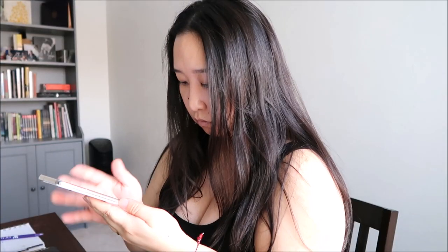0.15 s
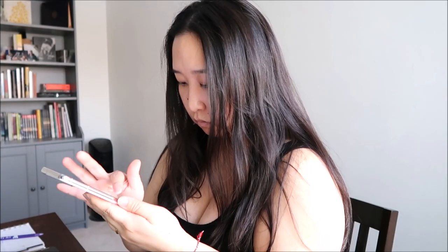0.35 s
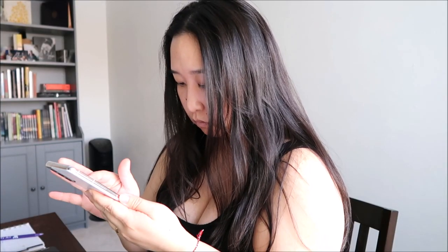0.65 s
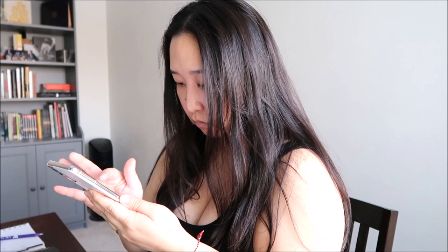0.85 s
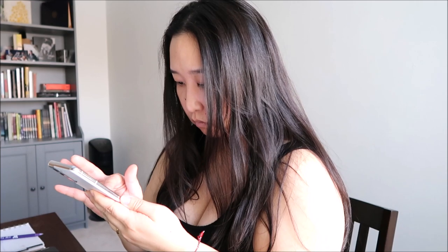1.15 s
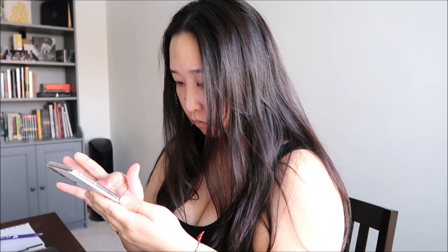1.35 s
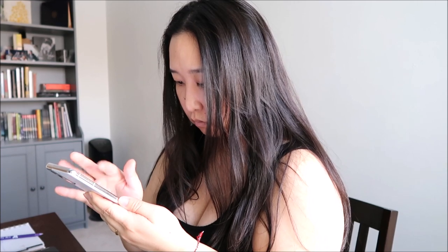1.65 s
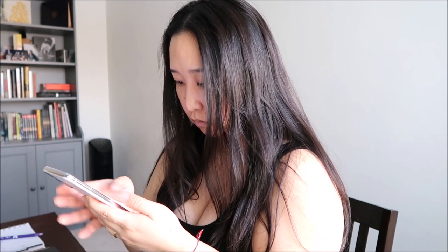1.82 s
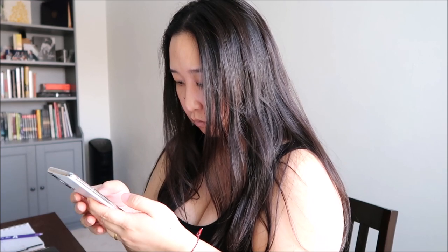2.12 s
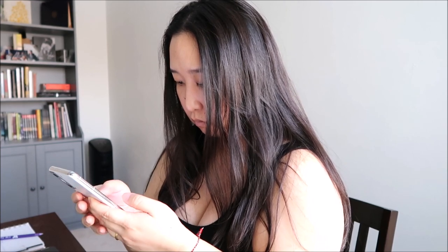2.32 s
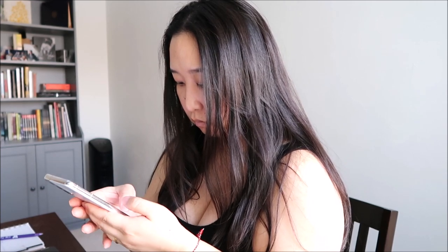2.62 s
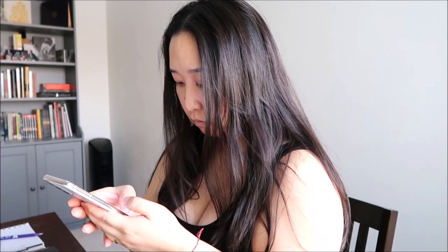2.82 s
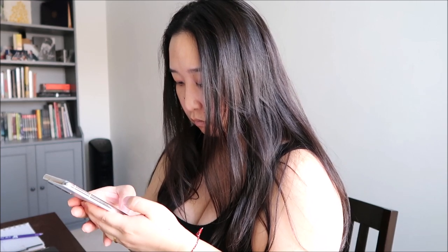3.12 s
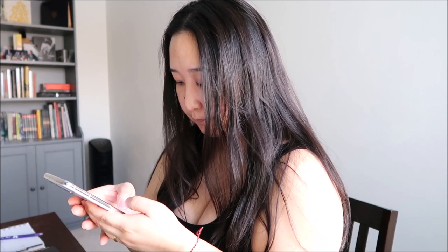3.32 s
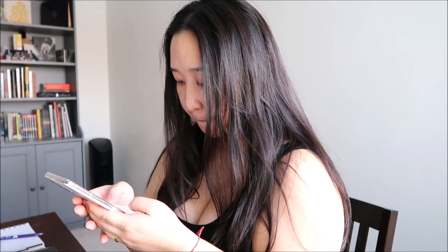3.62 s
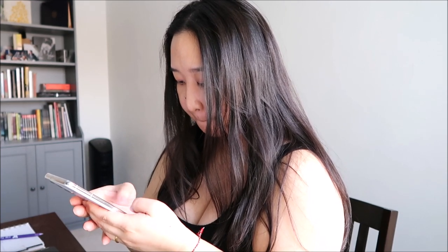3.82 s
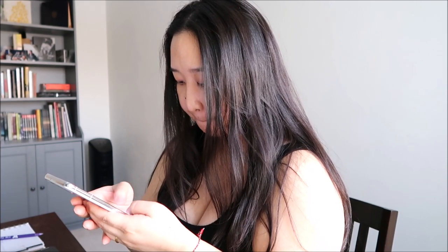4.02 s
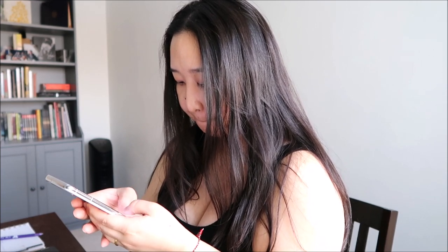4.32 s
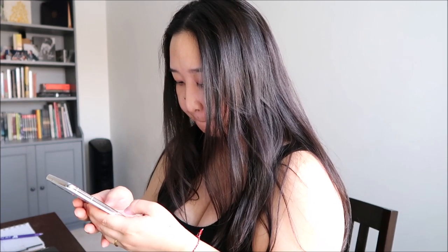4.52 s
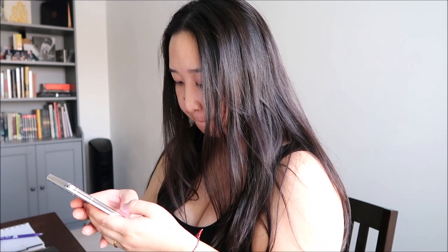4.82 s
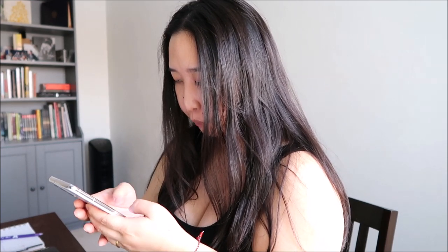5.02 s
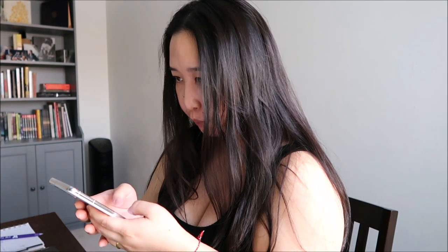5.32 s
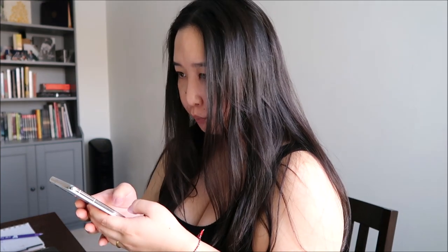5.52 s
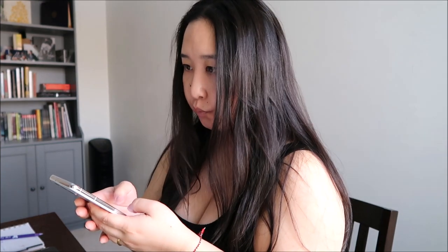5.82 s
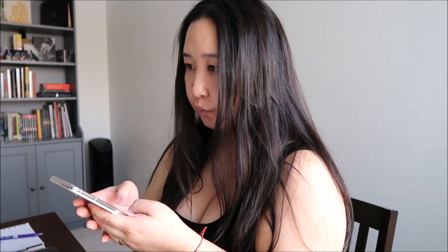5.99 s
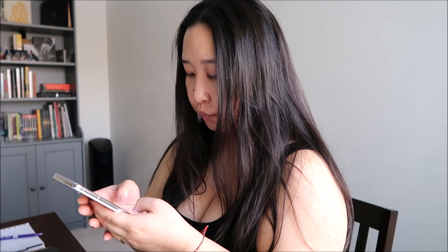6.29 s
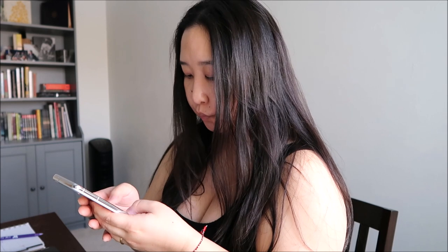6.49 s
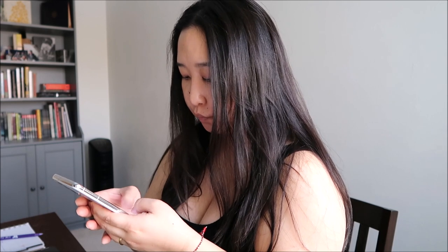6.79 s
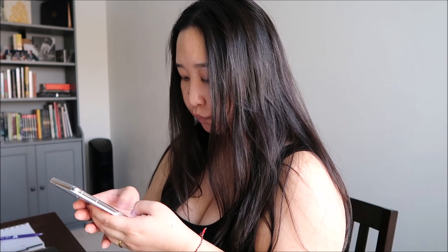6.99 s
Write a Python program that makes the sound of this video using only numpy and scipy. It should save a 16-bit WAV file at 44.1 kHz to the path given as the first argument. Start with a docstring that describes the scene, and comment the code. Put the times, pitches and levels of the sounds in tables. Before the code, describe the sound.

Throughout about seven seconds, a quiet study holds a low electrical hum, strongest near 120 Hz and wavering slightly, with a faint appliance motor, softly swelling rumble and thin airy hiss. A weak high whine around 2.4 kHz flutters nine to ten times a second, slightly to the left. Very close to the stereo camera microphones, the focus drive makes tiny dry, bright ticks around 4 kHz: a short burst from 0.1 to 0.4, a few separate clicks at 0.7 to 0.85, then rapid uneven patterns repeating five times a second from 0.9 to 2.4 and 2.55 to 5.05. Irregular single ticks follow until about 6.17, with faint dull knocks under some at 5.87, 5.9 and 6.1. A barely audible 13 kHz electronic whistle throbs throughout. After the ticks stop, only hum, whine and room air continue to the end.

```python
"""Room tone in a quiet study

Mains hum and an appliance motor, each a sum of tones, sit on shaped-noise rumble and hiss.
Two close high tones form a thin whine that beats nine to ten times a second.
Near the two microphones the camera's lens ticks (noise bursts through body modes) and its
electronics whistle, a throbbing sine; dull knocks of resonant noise lie under some of the last ticks."""
import sys
import numpy as np
from scipy import signal
from scipy.fft import rfft, irfft
from scipy.io import wavfile

SR = 44100
rng = np.random.default_rng(int(sys.argv[2]) if len(sys.argv) > 2 else 0)


def digitize_waveform(pressure):
    """Quantize a signal to 16-bit integers and store it at the path in sys.argv[1].

    Rows of a 2-D input are taken as channels; values are limited to [-1, 1].
    """
    field = np.atleast_2d(pressure).T
    bounded = np.clip(field, -1, 1)
    quanta = np.round(bounded * 32767).astype(np.int16)
    wavfile.write(sys.argv[1], SR, quanta)


N = 315315
T = np.arange(N) / SR
FREQS = np.fft.rfftfreq(N, 1 / SR)
LEFT_RIGHT = np.array([[1], [-1]])

MAINS_HZ = 60
# Hum of transformers and motors. Each row: multiple of the mains frequency, level in dB.
HUM_HARMONICS = [(1, -66), (2, -45), (6, -69.5), (7, -73), (8, -58), (10, -68.5)]
# Uneven level of the 120 Hz hum where it mixes with the rumble.
# Each row: time in seconds, change in dB before waver_share.
HUM_WAVER = [(0.0, 2), (0.12, 3), (0.33, -4), (0.7, 2), (1.25, -2), (1.42, 2), (1.77, 2), (2.1, 0),
             (2.35, -3), (2.7, 0), (3.2, -2), (4.08, 1), (4.55, -4), (4.95, 3.5), (5.25, -2), (6.0, 0.7),
             (6.3, 1.8), (6.58, -4), (7.15, 3.5)]
# Tones of a running appliance. Each row: frequency in Hz, level in dB before flutter.
MOTOR_TONES = [(29.9, -79), (53.6, -63.5), (90.3, -64.5), (330.5, -67.5), (362, -73.5), (665.2, -72.5),
               (1049, -81), (1230.5, -74.5), (1692, -76), (2341, -84), (2511, -80.5)]

# Loudness of the whine. Each row: time in seconds, level in dB before the left-right offset.
WHINE_LEVEL_DB = [(0.0, -65.5), (0.3, -64.5), (0.85, -68.5), (1.4, -62), (1.85, -62.5), (2.35, -62),
                  (3.3, -69.5), (3.9, -66), (4.45, -65.5), (4.85, -70), (5.2, -65), (5.95, -68),
                  (6.6, -64.5), (7.15, -63.5)]
# Drift of the whine. Each row: time in seconds, lower tone in Hz before jitter, distance to the upper in Hz.
WHINE_PITCH_HZ = [(0, 2426, 9.31), (1.1, 2428.2, 9.05), (1.8, 2427.1, 9.71), (2.5, 2425.8, 9.41),
                  (3.1, 2425, 8.84), (3.7, 2424.6, 9.66), (4.3, 2423.5, 9.21), (5.1, 2424.9, 9.49),
                  (5.7, 2426.9, 8.89), (6.4, 2427.6, 9.4), (7.15, 2429.3, 9.52)]
WHINE_UPPER_GAIN, WHINE_PAN_DB, WHINE_LEFT_LEAD_RAD = .75, 2.2, .42
FIRST_BEAT_S = .058

# One to-and-fro cycle of the focus drive. Each row: seconds into the cycle, dB relative to the bout.
CYCLE_STEPS = [(0, 4.5), (.0145, 0.5), (.0335, 0.5), (.0575, -3.5), (.1005, 2.5), (.114, -1.5), (.133, -4),
               (.1575, 1.5)]
# Bouts of repeated cycles. Each row: first second, end in seconds, dB relative to tick_db.
FOCUS_BOUTS = [(.119, .37, -4), (0.918, 2.41, -4), (2.555, 5.05, -2.5)]
# Single steps of the focus outside the regular cycle, loud and soft.
# Each row: time in seconds, dB relative to tick_db.
SINGLE_STEPS = [(0.688, 4.5), (.692, 0), (.720, 2), (.7535, -1), (.822, 3), (.840, 1), (5.132, 0),
                (5.198, 1), (5.293, 2), (5.332, 1), (5.399, 0), (5.467, 1), (5.632, 1), (5.650, 1),
                (5.700, 3), (5.717, 0), (5.767, 4), (5.800, -1), (5.817, -2), (5.867, 2), (5.873, -1),
                (5.900, 2), (5.916, -1), (5.966, 3), (6.106, 0), (6.138, 1), (6.166, 4)]
# Ring of the camera body. Each row: frequency in Hz, width in Hz, relative dB, left lead in radians.
BODY_MODES = [(3760, 260, -2, -1.5), (4150, 87, 7, 2.5), (4430, 270, -1.5, 0.73), (4860, 340, -9, -2.5),
              (5290, 170, -5.5, 1.5), (5830, 250, -10, 3)]
FOCUS_CYCLE_S, STRAYS_FROM_S, STRAYS_UNTIL_S = .2002, 0.87, 6.15

# Dull low knocks of the lens drive, under some of its last ticks.
# Each row: start in seconds, initial level in dB.
KNOCKS = [(5.868, -53), (5.897, -56), (6.106, -54.5)]

# Building rumble lifted by low room resonances. Each row: frequency in Hz, dB per Hz before trim and swell.
RUMBLE_SPECTRUM = [(18, -102), (38, -84.5), (54, -75.5), (66, -78), (100, -69), (135, -69.5), (172, -67),
                   (190, -70), (208, -68.5), (228, -78), (290, -78.5), (342, -76.5), (405, -83.5),
                   (428, -79.5), (462, -78), (495, -84.5), (525, -81.5), (570, -87.5)]
# Moving air and microphone hiss. Each row: frequency in Hz, dB per Hz before trim and flicker.
HISS_SPECTRUM = [(690, -86.5), (730, -86), (810, -86.5), (900, -89.5), (980, -88.5), (1130, -91.5),
                 (1350, -90.3), (1580, -91), (1700, -90.5), (1810, -94.5), (2110, -95.5), (2260, -92),
                 (2480, -94), (2750, -98.5), (3500, -101.3), (4700, -105), (6300, -108.6), (9000, -113.1),
                 (11500, -116.7), (12700, -120), (13400, -129.5)]
# Noise that differs between the microphones. Each row: frequency in Hz, dB per Hz before trim.
SIDE_SPECTRUM = [(18, -113), (60, -98), (130, -87), (220, -83), (460, -84), (550, -89.5), (1100, -93),
                 (2200, -99), (2420, -97.5), (2700, -101), (4000, -103), (6500, -109), (12500, -118.8),
                 (13400, -131.5)]
# Swell of the rumble. Each row: time in seconds, change in dB before swell_share.
RUMBLE_SWELL = [(0, -1), (0.55, 0.5), (1.23, -2), (1.5, 1.5), (2.4, -1.7), (3.15, 0), (3.45, 1), (4, 1),
                (4.5, 0), (4.97, 0.5), (5.3, 0), (5.6, 2), (6.1, -1), (6.5, 0.8), (6.85, -5), (7.15, 3)]
TOP_HZ = 13400


def undb(db):
    """Decibels to amplitude gain."""
    return 10 ** (np.asarray(db) / 20)


def walk(edge_hz):
    """Smooth random drift of rms 1: noise with a Gaussian rolloff, 1/e at edge_hz."""
    drift = irfft(rfft(rng.standard_normal(N)) * np.exp(-(FREQS / edge_hz) ** 2), N)
    return drift / np.sqrt(np.mean(drift ** 2))


def curve(points):
    """Straight-line interpolation of (s, value) points over the whole scene."""
    return np.interp(T, *np.transpose(points))


def noise(points):
    """Noise with a spectrum of (Hz, dB per Hz) points, interpolated over log frequency."""
    hz, db = np.transpose(points)
    gain = undb(np.interp(np.log(FREQS + 1), np.log(hz), db))
    return irfft(rfft(rng.standard_normal(N)) * gain, N) * np.sqrt(SR / 2)


def tone(hz, left_lead_rad=0):
    """Stereo sine of rms 1 and random phase; the left leads the right by left_lead_rad."""
    phase = 2 * np.pi * (np.cumsum(hz * np.ones(N)) / SR + rng.random())
    return np.sqrt(2) * np.cos(phase + LEFT_RIGHT * left_lead_rad / 2)


def resonance(hz, width_hz):
    """Complex response of one mode, gain 1 at its centre."""
    return 1j * FREQS * width_hz / (hz ** 2 - FREQS ** 2 + 1j * FREQS * width_hz)


def mains_hum(waver_share=0.8):
    """Harmonics locked to the mains; the second dominates, its level wavering irregularly."""
    hum = 0
    for multiple, db in HUM_HARMONICS:
        if multiple == 2:
            db = db + waver_share * curve(HUM_WAVER)
        hum = hum + undb(db) * tone(multiple * MAINS_HZ)
    return hum


def appliance(slip=0.0008, smear=0.0024, flutter_db=3.2):
    """Motor tones wander with load and flutter across the room; those above 1 kHz blur into narrow bands."""
    speed = 1 + slip * walk(6.1)  # shared by all tones
    motor = 0
    for hz, db in MOTOR_TONES:
        level = undb(db + flutter_db * walk(14.0))
        blur = (hz > 1000) * smear * walk(15.5)
        motor = motor + level * tone(hz * (speed + blur))
    return motor


def whine(jitter_hz=1.46, flutter_db=2.1):
    """Two close high tones drift together; their small, changing distance sets the pace of the beats."""
    times, lower_hz, apart_hz = np.transpose(WHINE_PITCH_HZ)
    hz = np.interp(T, times, lower_hz) + jitter_hz * walk(19.7)
    beat_cycles = np.cumsum(np.interp(T, times, apart_hz)) / SR - apart_hz[0] * FIRST_BEAT_S
    lower = np.exp(2j * np.pi * np.cumsum(hz) / SR + .5j * WHINE_LEFT_LEAD_RAD * LEFT_RIGHT)
    upper = lower * np.exp(2j * np.pi * beat_cycles)
    lower = lower * undb(flutter_db * walk(36.0))
    upper = WHINE_UPPER_GAIN * upper * undb(flutter_db * walk(9.7))
    pair = (lower + upper).real
    db = curve(WHINE_LEVEL_DB) + LEFT_RIGHT * WHINE_PAN_DB / 2
    return pair / np.std(pair) * undb(db)


def lens(tick_db=-56, snap_s=0.0018, ring_s=0.013, ring_db=-9, scatter_db=0.8, idle_db=-17, click_db=-14):
    """Each step of the focus drive is a tiny snap that rings the camera body, over a constant idle fizz."""
    grit = np.sign(rng.standard_normal(N))
    energy = np.zeros(N)
    for s, db in focus_steps():
        sample = int(np.clip(s * SR, 0, N - 1))
        energy[sample] += undb(db + scatter_db * rng.standard_normal()) ** 2

    def fade(decay_s):
        """Step energy with an exponential tail; decay_s is the amplitude time constant."""
        return signal.lfilter([1], [1, -np.exp(-2 / (decay_s * SR))], energy)

    # a weaker rattle outlasts the snap
    snap = fade(snap_s)
    power = snap + undb(ring_db) ** 2 * fade(ring_s) + undb(idle_db) ** 2

    body = 0
    for hz, width_hz, db, lead_rad in BODY_MODES:
        body = body + undb(db) * np.exp(.5j * lead_rad * LEFT_RIGHT) * resonance(hz, width_hz)
    # the housing carries little outside the range of its modes
    body = body / (1 + ((FREQS - 4700) / 1500) ** 6)
    body = body / np.sqrt(np.mean(np.abs(body) ** 2))
    ticks = irfft(rfft(grit * np.sqrt(power)) * body, N)

    # bright click of the contact, independent at each microphone
    click_noise = rng.standard_normal((2, N)) * np.sqrt(snap)
    click = irfft(rfft(click_noise) * resonance(hz=5950, width_hz=5500) ** 2, N)
    return undb(tick_db) * (ticks + 2 * undb(click_db) * click)


def focus_steps(stray_db=-5, stray_spread_db=4, count=50):
    """(s, dB) of every focus step: regular cycles, single steps and random stray corrections."""
    steps = list(SINGLE_STEPS)
    for first_s, until_s, bout_db in FOCUS_BOUTS:
        for start_s in np.arange(first_s, until_s, FOCUS_CYCLE_S):
            for offset_s, db in CYCLE_STEPS:
                if start_s + offset_s < until_s:
                    steps.append((start_s + offset_s, bout_db + db))
    for when, size in rng.random((count, 2)):
        s = STRAYS_FROM_S + when * (STRAYS_UNTIL_S - STRAYS_FROM_S)
        steps.append((s, stray_db + stray_spread_db * (2 * size - 1)))
    return steps


def knocks(hz=1400, width_hz=350, decay_s=0.0059):
    """Dull low knocks of the lens drive: resonant noise under sudden onsets and exponential decays."""
    envelope = sum(undb(db) * (T >= s) * np.exp(-np.abs(T - s) / decay_s) for s, db in KNOCKS)
    ring = irfft(rfft(rng.standard_normal(N)) * resonance(hz, width_hz) ** 2, N)
    return envelope * ring / np.std(ring)


def electronics(level_db=-80, fizz_db=-5, depth=0.78, whistle_hz=13007, frame_hz=30):
    """Faint high camera whistle, throbbing with each picture frame, plus a randomly modulated fizz."""
    throb = 1 + depth * np.cos(2 * np.pi * frame_hz * T + np.pi * 2 / 3)
    whistle = tone(whistle_hz, left_lead_rad=2.0) * throb
    fizz = undb(fizz_db) * walk(70) * tone(whistle_hz, left_lead_rad=1.9)
    return undb(level_db) * (whistle + fizz)


def room_air(mid_trim_db=0.76, side_trim_db=0.5, swell_share=1.0, flicker_db=2.02):
    """Swelling rumble and hiss common to both microphones, plus side noise of opposite sign in each."""
    mid = noise(list(RUMBLE_SPECTRUM) + list(HISS_SPECTRUM))
    spectrum = rfft(mid)
    low = irfft(spectrum / (1 + (FREQS / 230) ** 8), N)
    mid = mid + low * (undb(swell_share * curve(RUMBLE_SWELL)) - 1)
    # the moving air flickers, each half octave on its own
    for hz in 500 * np.sqrt(2) ** np.arange(4):
        band = irfft(spectrum * np.exp(-((FREQS / hz - 1) * 5) ** 2), N)
        mid = mid + band * (undb(flicker_db * walk(43)) - 1)
    side = undb(side_trim_db) * noise(SIDE_SPECTRUM)
    return undb(mid_trim_db) * mid + LEFT_RIGHT * side


def scene():
    """Sum of all sources."""
    return mains_hum() + appliance() + whine() + lens() + knocks() + electronics() + room_air()


def record(dry):
    """The camera cuts the top of the spectrum: elliptic low-pass, 0.1 dB ripple, 70 dB stopband."""
    low_pass = signal.ellip(10, .1, 70, TOP_HZ, fs=SR, output="sos")
    return signal.sosfilt(low_pass, dry)


dry = scene()
out = record(dry)
digitize_waveform(out)
```